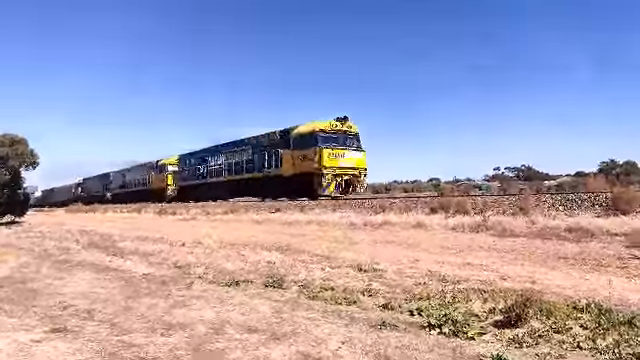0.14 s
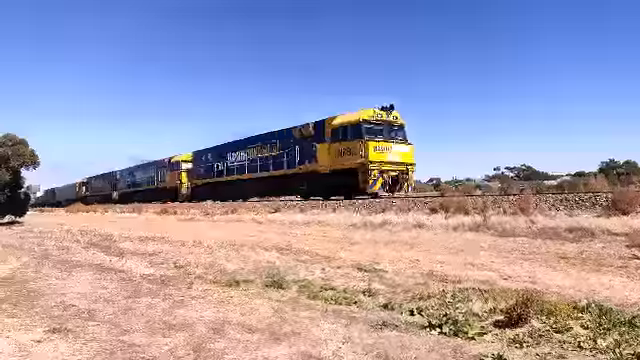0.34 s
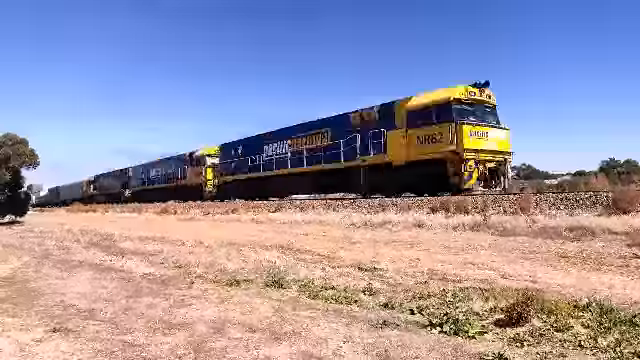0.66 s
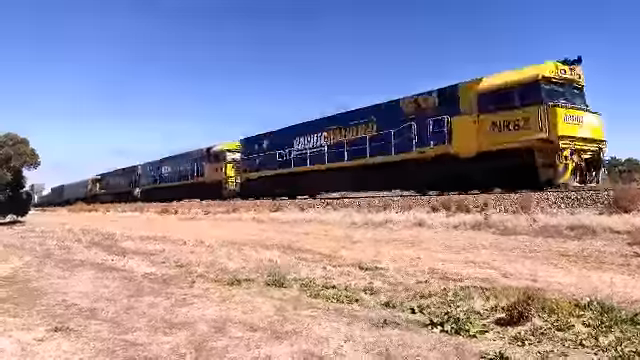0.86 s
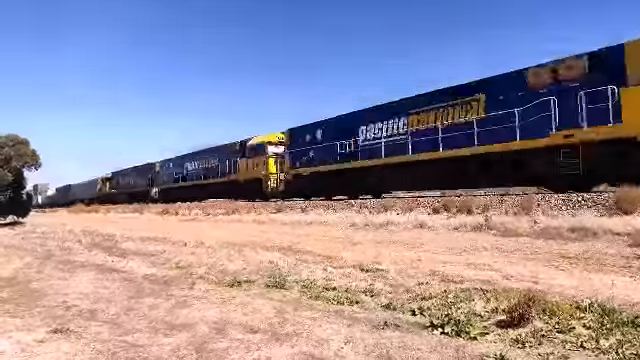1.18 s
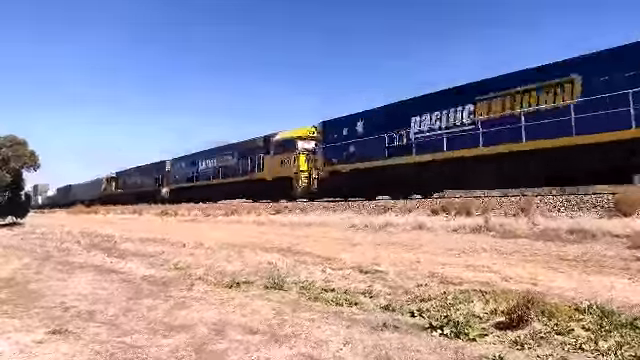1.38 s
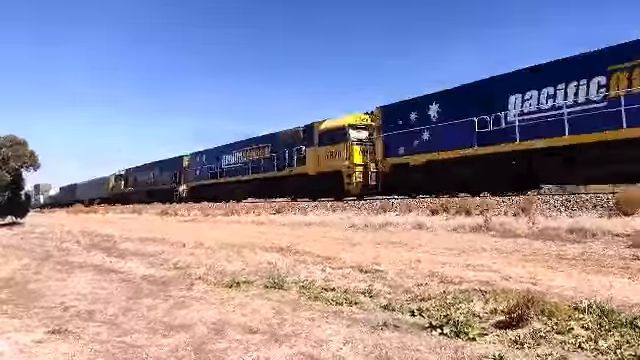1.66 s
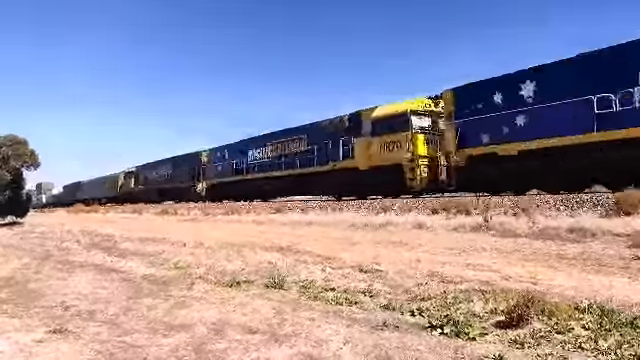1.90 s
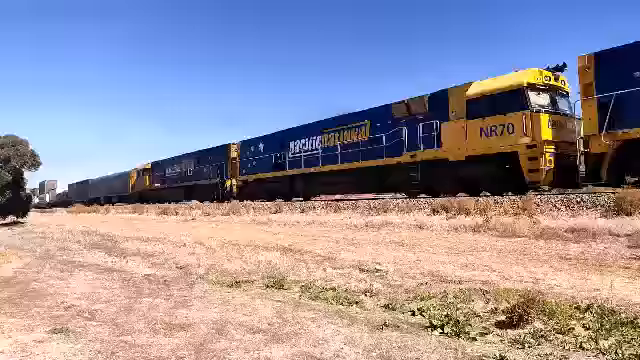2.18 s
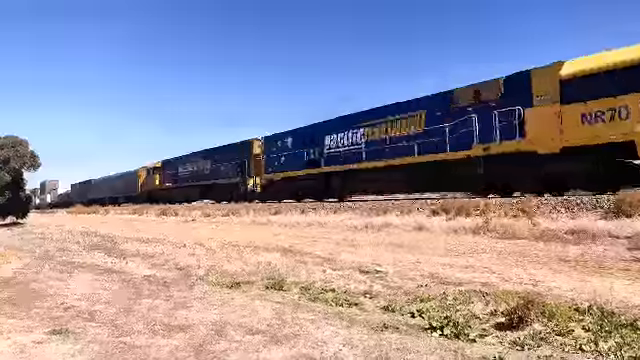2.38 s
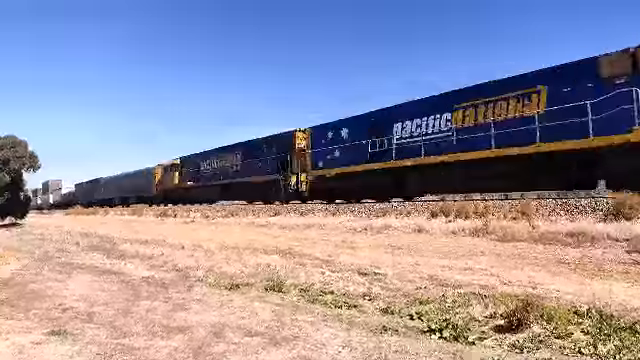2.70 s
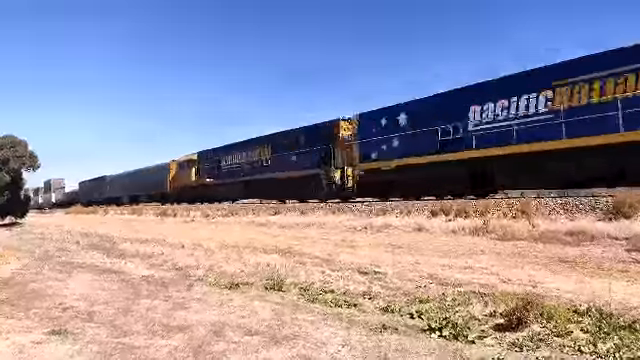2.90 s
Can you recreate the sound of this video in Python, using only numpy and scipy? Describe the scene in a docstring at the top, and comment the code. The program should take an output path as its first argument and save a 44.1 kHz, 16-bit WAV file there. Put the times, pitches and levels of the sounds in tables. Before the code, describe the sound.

A freight train draws near, its diesel locomotives whining and throbbing over the rush of distant wagons. Wind thumps the microphone beside the outdoor track, then the engines pass close, with loud wheel roar, hiss and short metallic scrapes.

```python
"""Open dry country, a two-port microphone 15 m from the rails, a freight train passing left to right.
Diesel-electric locomotives lead: five bogies with whining traction gears and roaring wheels, and two
engines with throbbing exhausts and turbo whistles; they swell as they pass and their tones sag in pitch.
Machine tones flare and flanges scrape close by, wagons hiss far up the line, wind buffets the ports."""
import sys
import numpy as np
from scipy import signal
from scipy.fft import rfft, irfft
from scipy.io import wavfile
from scipy.ndimage import map_coordinates

SR = 44100
rng = np.random.default_rng(int(sys.argv[2]) if len(sys.argv) > 2 else 0)


def store_wav(level_fs):
    """Save 16-bit WAV to argv[1]."""
    pcm = np.round(np.clip(np.atleast_2d(level_fs), -1, 1) * 32767)
    wavfile.write(sys.argv[1], SR, pcm.T.astype(np.int16))


N = 134505
TIME = np.arange(N) / SR
SPEED_M_S, TRACK_M = 18, 15  # train speed, microphone to rails
AIM_RAD, PORTS_MS = 0.56, 0.52  # microphone aim away from the track, travel time between its ports

# bogies: abeam t/s, gear f/Hz, whine level/dB, wheel level/dB
BOGIES = [(1.9, 464, -2.5, -1), (2.7, 463.5, 1, 0), (3.1, 477.5, -1.5, -1.5), (3.95, 477, -2, 1.5),
          (4.6, 476, -8.5, 1)]
# partials of the gear whine: multiple, level/dB
GEAR_PARTIALS = [(1, -11), (2, -2), (3, -13.5), (4, -13), (5, -10.5), (6, -9), (7, -21)]
# the strong second partial, on top of its swell with distance: t/s, level/dB
SECOND_PARTIAL = [(0, -10), (.2, -5.5), (.44, -3.5), (.51, 2.5), (.62, 3), (.69, -2.5), (.93, 0), (1.3, -1),
                  (1.58, -2.5), (1.75, -.5), (1.93, -1), (2.02, 5), (2.15, 4.5), (2.26, 6), (2.47, 7),
                  (2.55, 3), (2.68, 2.5), (2.75, 6), (2.85, 4.5), (2.92, 2), (3.05, 3)]

def gears(level_db=-26, wander=0.002011):
    """Each bogie's traction gears whine on a row of partials; the high ones fade faster with distance."""
    out = 0
    second_swell = undb(np.interp(TIME, *np.array(SECOND_PARTIAL).T))
    for when, hz, db, _ in BOGIES:
        near, doppler, lag = passing(when)
        pitch = hz * doppler * (1 + wander * walk(3.9))
        for k, partial_db in GEAR_PARTIALS:
            fall = 1 + 0.11 * max(k - 2, 0)
            gain = near ** fall * undb(level_db + db + partial_db) * (second_swell if k == 2 else 1)
            out = out + gain * tone(k * pitch, lag, flutter=0.28, rough=0.26)
    return out


# spectra of the wheel and rail roar, and of the hiss heard from abeam: f/Hz, level/dB
ROAR = [(25, -30), (60, -10), (120, -2.5), (330, -0.5), (470, -2), (600, -2), (780, -5), (1020, -1),
        (1220, -13), (1500, -5), (1730, -11), (1930, -2.5), (2150, -7.5), (2450, -8.5), (2700, -46),
        (2920, -7), (3200, -12), (5000, -10.5), (8000, -25), (13000, -87)]
HISS = [(200, -23), (1000, 4), (1900, -2), (2450, 4), (2950, 2.5), (3200, -5.5), (4300, -4), (6000, -6),
        (7400, -5), (8300, -10.5), (10000, -14.5), (12000, -24.5), (14000, -45)]
# paths to the microphone, straight and scattered by the ground: f/Hz, level/dB
DIRECT_PATH = [(1400, 0), (2600, -2), (4000, -6.5), (7000, -8)]
GROUND_PATH = [(1500, -4), (2600, -1.5), (4000, 0), (7000, 0)]

def wheels(roar_db=-26.5, hiss_db=-27, shimmer_db=2):
    """Wheels roar on the rails; their hiss carries mostly sideways, so it rises late at the microphone."""
    direct, hiss_power = 0, 0
    for when, _, _, db in BOGIES:
        near, _, lag = passing(when)
        hiss_gain = undb(hiss_db + db) * near ** 2.01
        roar = undb(roar_db + db + shimmer_db * walk(8.2)) * near * noise(ROAR)
        hiss = hiss_gain * undb(shimmer_db * walk(27)) * noise(HISS)
        direct = direct + ports(colour(roar + hiss, DIRECT_PATH), lag)
        hiss_power = hiss_power + hiss_gain ** 2
    # the ground scatters the treble: half ringing steel, half plain hiss
    treble = [np.sqrt(0.5) * (unit(colour(rings, HISS)) + noise(HISS)) for rings in ringing_steel()]
    scattered = np.array([colour(port, GROUND_PATH) for port in treble])
    flicker = undb(0.7 * walk(15))
    return direct + np.sqrt(hiss_power) * flicker * scattered


def ringing_steel(count=2400, low_hz=1401, high_hz=10997, decay_s=0.011, spread_db=2):
    """A dense patter of briefly ringing steel parts, each with its own phase at either port."""
    n = SR // 10
    age = np.arange(n) / SR
    fade = age * np.exp(-age / decay_s)
    out = np.zeros((2, N + 2 * n))
    for (when, pitch, *turns), size in zip(rng.random((count, 4)), rng.standard_normal(count)):
        start = int(when * (N + n))
        hz = low_hz + pitch * (high_hz - low_hz)
        ring = np.sin(2 * np.pi * (hz * age + np.array(turns)[:, None]))
        out[:, start:start + n] += undb(spread_db * min(size, 2)) * fade * ring
    return out[:, n:n + N]


# engines: abeam t/s, firing f/Hz, exhaust level/dB, turbo f/Hz, turbo level/dB
ENGINES = [(2.6, 119, 0.5, 2520, 1), (3.85, 121, -4.5, 2440, 0)]
# cylinders in firing order: level/dB
CYLINDERS = [9.5, -20, 1, 1.5, 4.5, -19, 4, 3]
# spectrum of the exhaust: f/Hz, level/dB
EXHAUST = [(25, -27), (45, -18), (60, 1), (85, -5), (125, 1.5), (200, 0.5), (350, 2), (600, -6.5),
           (1200, -10), (4000, -56)]
# whistles of turbo and blower: ratio to turbo pitch, level/dB
WHISTLES = [(.615, -34.5), (1, -39.5), (2, -41)]

def engines(exhaust_db=-31.5, uneven_db=3.5):
    """Uneven firings puff through the stack; turbo and blower whistle above."""
    out = 0
    for when, hz, db, turbo_hz, turbo_db in ENGINES:
        near, doppler, lag = passing(when)
        firings = np.flatnonzero(np.diff(np.floor(np.cumsum(hz * doppler) / SR)))
        scatter_db = uneven_db * rng.standard_normal(N)[:len(firings)]
        pulses = np.zeros(N)
        pulses[firings] = undb(np.resize(CYLINDERS, len(firings)) + scatter_db)
        exhaust = unit(unit(colour(pulses, EXHAUST)) + 0.5 * noise(EXHAUST))
        out = out + ports(undb(exhaust_db + db) * near ** 0.83 * exhaust, lag)
        for ratio, whistle_db in WHISTLES:
            whistle = tone(ratio * turbo_hz * doppler, lag, flutter=0.65, rough=0.96)
            out = out + near ** 1.3 * undb(turbo_db + whistle_db) * whistle
    return out


# brief machine tones: start t/s, length/s, f/Hz, level/dB, glide/(Hz/s), roughness
BRIEF_TONES = [(1.18, 0.084, 3380, -39, -100, .2), (1.051, 0.57, 1636, -38.5, -20, 0.43),
               (1.2, 0.29, 5300, -41.5, -100, .7), (1.27, 0.25, 2870, -33, -100, 0.54),
               (1.83, 0.12, 595, -31, -25, 0.44), (1.996, 0.32, 1444, -30, -40, 0.15),
               (2.15, 0.18, 2592, -29, -70.5, 0.2), (2.24, 0.2, 3000, -34.5, -200, 0.34),
               (2.45, 0.16, 2805, -34, -130, 0.28), (2.492, 0.23, 5125, -39.5, -120, 0.44),
               (2.52, 0.296, 494, -26, -25, 0.14), (2.76, 0.28, 2322, -26.5, -85.5, 0.069),
               (2.779, 0.28, 2532, -29, -80, 0.15), (2.76, 0.25, 2905, -32.5, -90, .25)]

def brief_tones(edge_s=0.014):
    """Gear whine, turbo whistle and other machine tones flare up briefly as the locomotives draw level."""
    out = 0
    _, _, lag = passing(BOGIES[1][0])
    for start, length, hz, db, glide, rough in BRIEF_TONES:
        age = TIME - start
        swell = np.clip(age / edge_s, 0, 1) * np.clip((length - age) / edge_s, 0, 1)
        out = out + undb(db) * swell * tone(hz + glide * age, lag, flutter=0.24, rough=rough)
    return out


# flange scrapes: peak t/s, width/s, centre f/Hz, level/dB, left minus right/dB
SCRAPES = [(0.816, 0.028, 7000, -41, 2), (1.557, .025, 7500, -34, 6), (2.65, .012, 9500, -38, 7),
           (2.716, 0.025, 9200, -33, 2), (2.77, .01, 9300, -33, 5), (2.908, 0.022, 9200, -38, 7),
           (2.997, .014, 8700, -32, 8)]

def flanges(band_ratio=1.5):
    """Wheel flanges scrape the rail in short bright bursts."""
    out = 0
    for when, width, hz, db, pan_db in SCRAPES:
        band = [(hz / band_ratio ** 2, -60), (hz / band_ratio, -25), (hz, 0), (hz * band_ratio, -25)]
        out = out + burst(when, width, db, pan_db) * noise_pair(band)
    return out


# spectrum of the distant wagons: f/Hz, level/dB
WAGON_RUSH = [(25, -26), (45, -12), (62, -0.5), (90, -4), (140, 7), (250, 1.5), (400, -10), (600, -11),
              (800, -21), (1000, -29), (1200, -16), (1550, -4.5), (2400, -21), (2750, -21), (3200, -24.5),
              (5000, -15.5), (7300, -15), (8500, -44), (12500, -62)]
# port balance for sound from far up the line: f/Hz, left minus right/dB
FAR_BALANCE = [(100, 8), (700, 9), (1200, -13.5), (2200, -8), (2800, 7), (3300, 28), (4500, 19), (6000, -5),
               (8000, 22), (12000, -17)]

def wagons(level_db=-33, spread=0.88):
    """The long train behind rushes steadily from far up the line."""
    _, _, lag = passing(when=6.2)
    rush = ports(noise(WAGON_RUSH), lag) + spread * noise_pair(WAGON_RUSH)
    return undb(level_db) * unit(shade(rush, FAR_BALANCE))


# buffets on the ports: peak t/s, width/s, level/dB, left minus right/dB
BUFFETS = [(0.082, 0.028, -40.5, 16), (0.252, 0.053, -35, 10), (0.474, 0.27, -39.5, 8),
           (0.728, 0.28, -32, -7), (1.096, 0.042, -14, 2), (1.172, 0.054, -22, -6), (1.333, 0.027, -23, 4),
           (1.456, 0.11, -27.5, 8), (2.86, 0.059, -29, -11), (2.987, 0.061, -24.5, -10)]
# spectrum of a buffet: f/Hz, level/dB
WIND_RUMBLE = [(30, -16), (80, -4.5), (130, 3), (320, 3.5), (470, -3), (700, -9.5), (1500, -13.5),
               (5000, -64)]
# thumps of air: peak t/s, f/Hz, level/dB, left minus right/dB, width/s
THUMPS = [(0.056, 230, -23.5, 16, 0.0048), (0.273, 206, -18.5, 14, 0.0039), (0.638, 286, -17.5, 10, 0.0035),
          (1.089, 267, -14, 1, 0.0088), (1.162, 210, -14.5, -11, 0.0065), (1.466, 315, -15, 13, 0.0053),
          (1.74, 308, -19.5, 12, 0.0071)]

def wind():
    """Eddies buffet each microphone port separately; the smallest give a single low thump."""
    out = sum(burst(*row) for row in BUFFETS) * noise_pair(WIND_RUMBLE)
    for when, hz, db, pan_db, width in THUMPS:
        out += burst(when, width, db, pan_db) * np.cos(2 * np.pi * hz * (TIME - when))
    return out


def passing(when):
    """Nearness (1 abeam), Doppler factor and left port's lag in samples for a point abeam at when."""
    ahead_m = SPEED_M_S * (when - TIME)
    distance_m = np.hypot(ahead_m, TRACK_M)
    doppler = 1 / (1 - SPEED_M_S * ahead_m / distance_m / 343)
    lag = PORTS_MS * SR / 1000 * np.sin(np.arctan2(TRACK_M, ahead_m) - AIM_RAD)
    return TRACK_M / distance_m, doppler, lag


def ports(x, lag):
    """One sound reaching the two ports at different times."""
    return np.array([map_coordinates(x, [np.arange(N) + side * lag / 2], order=3, mode="mirror")
                     for side in (-1, 1)])


def shade(pair, balance):
    """The recorder's body favours one port, by frequency."""
    return np.array([colour(x, [(hz, side * db / 2) for hz, db in balance])
                     for x, side in zip(pair, (1, -1))])


def tone(hz, lag, flutter, rough):
    """A partial that flutters slowly and has a rough skirt of its own at each port."""
    body = 1 + flutter * (walk(12.5) + 1j * walk(2.1))
    skirt = rough * np.array([walk(43) + 1j * walk(28) for _ in range(2)])
    phase = 2 * np.pi * (np.cumsum(hz) + np.array([[-.5], [.5]]) * lag * hz) / SR
    return unit(np.real((body + skirt) * np.exp(1j * phase)))


def burst(when, width, db, pan_db):
    """A bell-shaped swell at the two ports."""
    return undb(db + np.array([[.5], [-.5]]) * pan_db) * np.exp(-2 * ((TIME - when) / width) ** 2)


def walk(rate):
    """Smooth random drift of spread 1 that changes about rate times a second."""
    hz = np.arange(1025) / 4
    drift = unit(irfft(rfft(rng.standard_normal(2048)) / (1 + (hz / rate) ** 2)))
    return np.interp(TIME, np.arange(2048) / 512, drift)


def colour(x, points):
    """Filter by (f/Hz, level/dB) points joined on a log-frequency axis."""
    hz, db = np.array(points, float).T
    f = np.maximum(np.arange(N // 2 + 1) * SR / N, 1)
    return irfft(rfft(x) * undb(np.interp(np.log(f), np.log(np.sort(hz)), db)), N)


def noise(points):
    """Coloured noise of rms 1."""
    return unit(colour(rng.standard_normal(N), points))


def noise_pair(points):
    """Separate noise at each port."""
    return np.array([noise(points), noise(points)])


def undb(db):
    """Decibels to gain."""
    return 10 ** (np.asarray(db) / 20)


def unit(x):
    """Scale to rms 1."""
    return x / np.sqrt(np.mean(x ** 2))


# port balance for sound from close by: f/Hz, left minus right/dB
NEAR_BALANCE = [(100, -3), (600, 2.5), (1000, 0.5), (2400, -1), (3500, 5.5), (5000, 1.5), (7500, 4),
                (10000, 5.5), (12500, 13)]

def scene():
    """Locomotives close by, wagons far up the line, wind at the microphone."""
    locomotives = shade(gears() + wheels() + engines() + brief_tones(), NEAR_BALANCE)
    return locomotives + flanges() + wagons() + wind()


def record(dry):
    """The recorder cuts the top above 13.3 kHz."""
    return signal.sosfilt(signal.ellip(8, .2, 70, 13300, fs=SR, output="sos"), dry)


dry = scene()
out = record(dry)
store_wav(out)
```